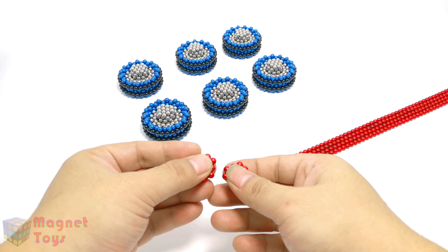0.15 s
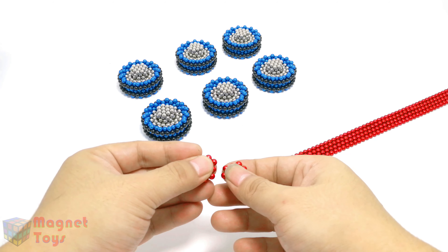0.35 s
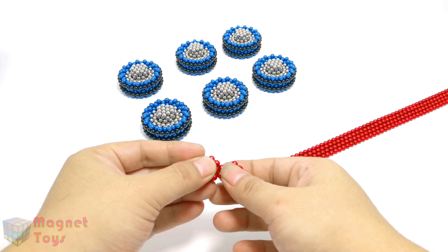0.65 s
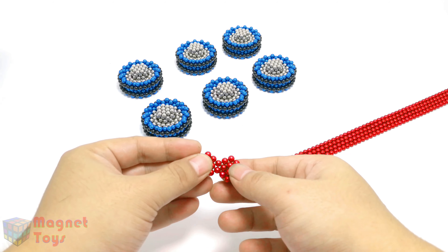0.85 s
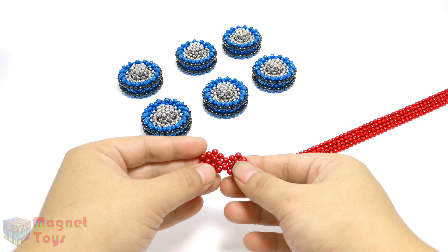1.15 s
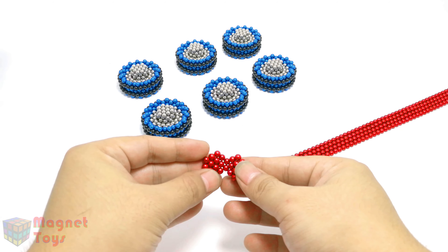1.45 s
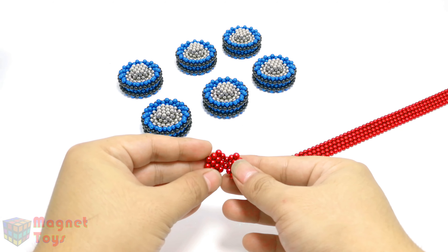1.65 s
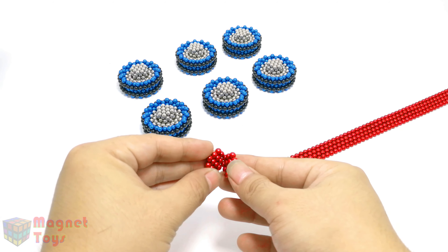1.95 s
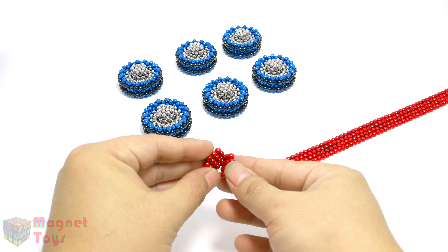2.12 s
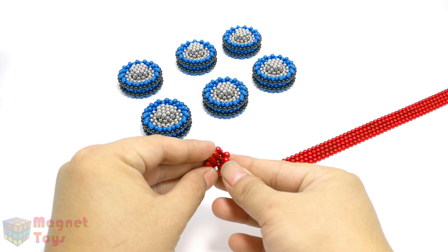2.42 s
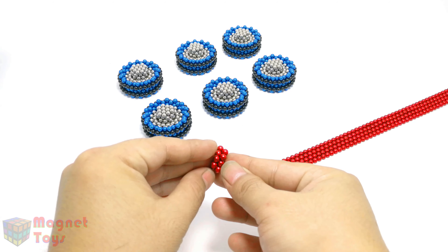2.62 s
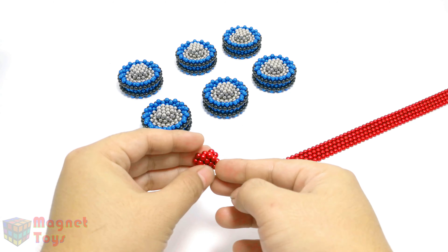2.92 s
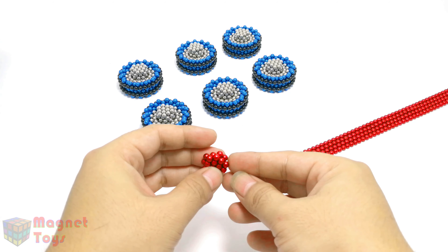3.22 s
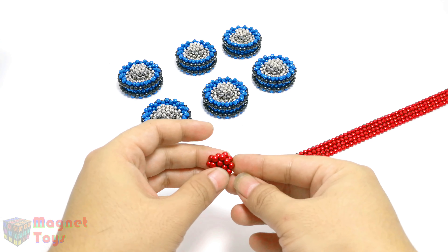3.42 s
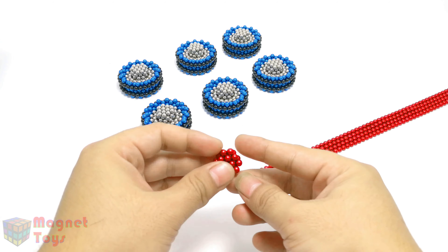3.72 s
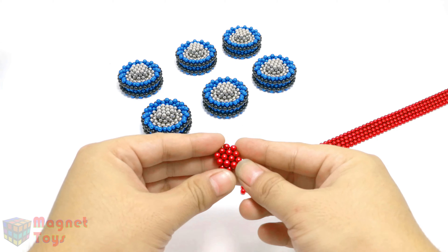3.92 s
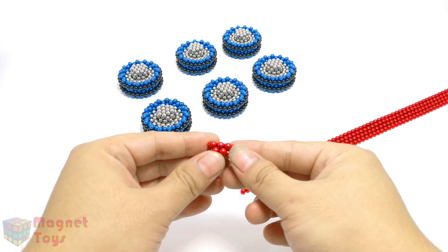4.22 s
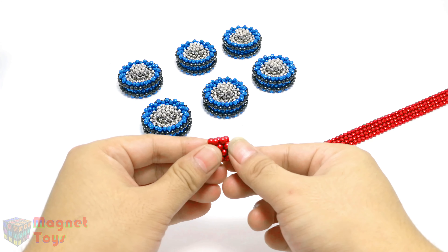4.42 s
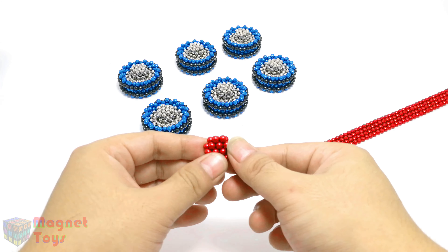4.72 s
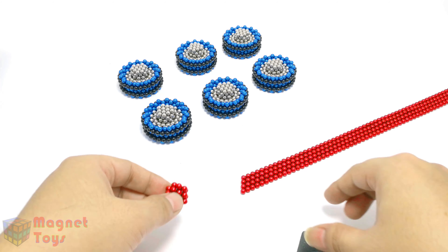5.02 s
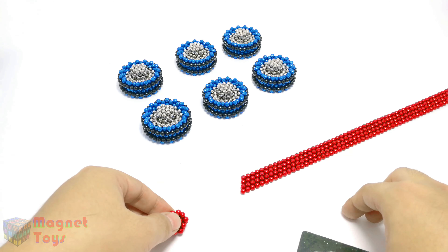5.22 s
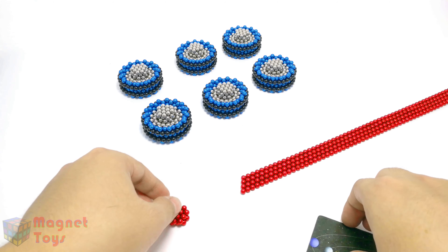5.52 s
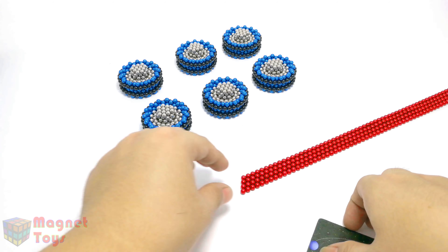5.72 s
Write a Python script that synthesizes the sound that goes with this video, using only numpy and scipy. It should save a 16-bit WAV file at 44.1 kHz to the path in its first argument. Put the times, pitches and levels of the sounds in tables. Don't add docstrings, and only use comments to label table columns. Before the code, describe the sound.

Small steel magnet balls snap together sharply in a quiet humming room, then a stiff card is tapped and dragged across a table.

```python
import sys
import numpy as np
from scipy import signal
from scipy.io import wavfile
from scipy.ndimage import uniform_filter1d

SR = 44100
rng = np.random.default_rng(int(sys.argv[2]) if len(sys.argv) > 2 else 0)


def output_pcm(signal):
    pcm = np.clip(np.atleast_2d(signal).T, -1, 1) * 32767
    wavfile.write(sys.argv[1], SR, np.round(pcm).astype(np.int16))


def how_loud(loudness_db):
    steps = np.asarray(loudness_db, float) / 20
    return 10 ** steps


N = 258426


def evened(x):
    return x / np.sqrt(np.mean(x ** 2) + 1e-20)


def read(points, hz):
    f, value = np.transpose(points)
    return np.interp(np.log(hz + 1), np.log(f + 1), value)


def add(mix, s, sound):
    part = mix[..., round(s * SR):][..., :sound.shape[-1]]
    part += sound[..., :part.shape[-1]]


def resonate(x, hz, width):
    hz = min(hz, .45 * SR)
    return signal.lfilter(*signal.iirpeak(hz, hz / width, SR), x)


def colour(x, points):
    hz = abs(np.fft.fftfreq(2048, 1 / SR))
    log_gain = read(points, hz) * np.log(10) / 20
    taps = np.fft.ifft(np.exp(log_gain - 1j * signal.hilbert(log_gain).imag)).real
    return signal.oaconvolve(x, taps[:1024])[:len(x)]


def dying_noise(decays):
    hz, t, z = signal.stft(rng.standard_normal(SR // 4), SR, nperseg=128)
    t60 = np.clip(read(decays, hz), .02, .4)[:, None]
    return signal.istft(z * how_loud(-60 * t / t60), SR, nperseg=128)[1][:SR // 4]


# (frequency [Hz], time to fall 60 dB [s])
ECHO_TIMES = [(1500, .05), (4000, .085), (7000, .105), (12000, .12)]


def snap(spectrum, db, t60, far_db, tail_db, far_tail_db, thump_db):
    t = np.arange(SR // 4) / SR
    out = []
    thump = resonate((np.arange(len(t)) == 16) * 3., 2200, 4500)
    for side_db, side_tail_db in ((0, 0), (far_db, far_tail_db)):
        burst = rng.standard_normal(len(t)) * how_loud(-60 * t / t60) * np.minimum(t / .0004, 1)
        burst[16] += 3
        burst = colour(burst, spectrum)
        burst = burst / abs(burst).max() + how_loud(thump_db + 5) * thump
        early = dying_noise(ECHO_TIMES)
        late = how_loud(-17) * dying_noise([(hz, 2.05 * s) for hz, s in ECHO_TIMES])
        tail = evened(colour(early + late, spectrum)) * np.clip(t / .002, 0, 1)
        out.append(how_loud(db + side_db) * burst + how_loud(tail_db + side_tail_db) * tail)
    return np.array(out)


# (time [s], peak level [dB], burst fall by 60 dB [s], far burst level [dB])
SNAPS = [
    (.4685, -1.5, .0065, -9),
    (2.3643, -5, .013, -9),
    (2.3722, -1.5, .008, -9),
    (2.4927, -8, .006, -16),
    (2.4959, -1, .007, -16),
]
# (level [dB], far level re near [dB])
SNAP_ECHOES = [(-37, 1), (-41, 1), (-38, 2), (-43, 1), (-39.5, 2)]
SNAP_PUSHES = [-41, -47, -31, -44, -29]
# (frequency [Hz], level [dB per Hz])
SNAP_COLOURS = [
    [(410, -57), (700, -24.5), (1070, -32), (1220, -26), (2060, -30.5), (2900, -20.5), (3410, -34.5),
     (5350, -12), (5950, -22.5), (7770, -12.5), (9110, -22.5), (10000, -11), (13800, -4.5), (15900, -6.5),
     (16800, -29)],
    [(410, -76), (700, -48), (950, -43), (1210, -27), (3410, -24), (6030, -6.5), (7470, -5.5), (8190, -7.5),
     (12700, -2), (14900, -2), (16800, -22)],
    [(410, -51.5), (700, -23), (1060, -42), (1270, -31.5), (4000, -15), (6620, -2), (7270, -1), (9360, 0.5),
     (12700, 5), (15100, 2), (16800, -19)],
]


def balls():
    out = np.zeros((2, N))
    groups = (0, 1, 1, 2, 2)
    for group, (s, *row), echo, push_db in zip(groups, SNAPS, SNAP_ECHOES, SNAP_PUSHES):
        add(out, s, snap(SNAP_COLOURS[group], *row, *echo, push_db))
    return out


# (frequency [Hz], width [Hz], level [dB])
TABLE_RINGS = [(255, 40, -9), (455, 30, -9), (612, 28, 0), (700, 25, -3), (960, 40, -13)]


def knock(spectrum, db, t60, table_db, bounces_per_s):
    t = np.arange(SR // 4) / SR
    noise, chance, size = rng.standard_normal(len(t)), rng.random(len(t)), rng.standard_normal(len(t))
    bounces = 3 * size * (chance < bounces_per_s / SR)
    contact = (.5 * noise + bounces) * how_loud(-60 * t / t60)
    contact[8] -= 5
    wake = 0.41 * dying_noise([(500, 0.3), (3000, 0.13), (16000, 0.13)])
    body = colour(contact + wake, spectrum)
    top = sum(how_loud(d) * resonate(contact, f, w) for f, w, d in TABLE_RINGS)
    return how_loud(db - 14.5) * (evened(body) + how_loud(table_db) * evened(top))


def effort(moves, t):
    s, db, swell_s, fade_s, companion_db = np.transpose(moves)[..., None]
    before = (s - t) / np.maximum(swell_s, .004)
    after = (t - s) / np.maximum(fade_s, .004)
    power = how_loud(db - 20 * np.where(t < s, before, after)) ** 2
    main = np.sqrt(power.sum(0))
    companion = np.sqrt((power * how_loud(companion_db) ** 2).sum(0))
    return main, companion


# (fastest moment [s], scratch level [dB], swell [s per 20 dB], fade [s per 20 dB], hiss re scratch [dB])
STROKES = [(3.61, -76, .6, .06, 2), (3.712, -63.5, .094, .041, -2), (3.782, -63.5, .044, .15, -11),
           (3.912, -76, .1, .15, -8), (5.042, -63.5, .015, .08, -7), (5.072, -60, .013, .064, -5),
           (5.176, -51, .012, .064, -19), (5.232, -52, .035, .2, -4), (5.268, -47.5, .07, .055, -3),
           (5.352, -57, .12, .03, -1), (5.386, -52, .012, .05, -4), (5.447, -63, .1, .12, -18),
           (5.618, -52.5, .022, .044, -8), (5.692, -49.5, .04, .09, -19), (5.788, -53, .025, .15, -13),
           (5.822, -47.5, .09, .045, -13)]
# (heaviest moment [s], low drag level [dB], swell [s per 20 dB], fade [s per 20 dB], table hum re drag [dB])
PRESSES = [(3.51, -61, .022, .5, -16), (3.712, -62, .3, .04, -7), (3.782, -56.5, .03, .09, -11),
           (3.912, -64, .04, .05, -9), (5.05, -65, .2, .1, -20), (5.176, -48, .012, .16, 5),
           (5.262, -53, .12, .1, 8), (5.353, -48, .07, .022, 4), (5.39, -54, .012, .14, 3),
           (5.462, -59, .3, .03, 7), (5.616, -65.5, .12, .05, 0), (5.72, -66, .3, .3, 0),
           (5.83, -65, .2, .3, -2)]


def rub(start, end, spectrum):
    t = np.arange(start, end, 1 / SR)
    slide, fizz = effort(STROKES, t)
    weight, drone = effort(PRESSES, t)
    noise, chance, size = rng.standard_normal(len(t)), rng.random(len(t)), rng.exponential(1, len(t))
    slips = noise * (0.54 + (chance < 2500 / SR) * how_loud(2.6 * np.minimum(size, 4)))
    scratch = evened(colour(slips, spectrum))
    rings = [how_loud(d) * resonate(resonate(slips, f, w), f, 4 * w) for f, w, d in TABLE_RINGS[2:]]
    hum = evened(sum(rings))
    low = evened(resonate(resonate(slips, 302, 230), 233, 340))
    hiss = evened(colour(slips, [(2500, -61), (5000, -6), (16000, -10)]))
    mix = slide * scratch + how_loud(-4) * drone * hum + fizz * hiss + how_loud(-4.5) * weight * low
    return how_loud(5.5) * mix * signal.windows.tukey(len(t), .08)


def tick(db, hz, t60):
    t = np.arange(SR // 12) / SR
    click, wake = how_loud(-60 * t / 0.0021), how_loud(-5 - 60 * t / t60)
    x = rng.standard_normal(len(t)) * (click + wake)
    x = resonate(resonate(x, hz, 0.89 * hz), hz, 0.96 * hz) + 0.074 * np.diff(x, prepend=0)
    return how_loud(db + 6.5) * x / abs(x).max()


SQUEAK_HZ = [9050, 9550, 10200]


def squeak(length, db):
    noise = rng.standard_normal(round(length * SR))
    bands = sum(resonate(noise, f, 300) for f in SQUEAK_HZ)
    return how_loud(db) * evened(bands) * signal.windows.tukey(len(noise), .4)


# (time [s], peak level [dB], centre [Hz], fall by 60 dB [s])
TICKS = [(0.852, -51, 11200, 0.03), (1.0492, -54, 8490, 0.03), (2.3245, -49, 11000, 0.02),
         (2.6774, -53, 11900, 0.03), (3.4002, -51, 13800, 0.034), (3.6034, -46, 10000, 0.026),
         (4.882, -49, 7900, 0.03), (5.041, -48.5, 3440, 0.044), (5.0738, -45.5, 3030, 0.064),
         (5.6064, -46.5, 3080, 0.032), (5.7497, -45.5, 4480, 0.059)]
# (time [s], peak level [dB], chatter fall by 60 dB [s], table ring level [dB], bounces [per s])
KNOCKS = [
    (4.839, -43.5, 0.099, -11, 1200),
    (5.152, -25, 0.083, -3.5, 800),
    (5.3594, -23.5, 0.086, -7, 870),
]
# (frequency [Hz], level [dB per Hz])
FINGER_COLOUR = [(70, -20), (120, 0), (380, -2), (520, -22), (1000, -32), (2800, -30), (4500, -55)]
# (frequency [Hz], level [dB per Hz])
CARD_FLAT = [(88, -45), (150, -20.5), (601, -9.5), (941, -10), (1900, -1.5), (2140, -10), (2360, -3.5),
             (3290, -20.5), (3550, -26), (5570, -55), (6770, -36), (9440, -27.5), (10600, -31),
             (11900, -26), (16000, -34)]
# (frequency [Hz], level [dB per Hz])
CARD_EDGE = [(88, -35), (150, -21), (222, -12.5), (601, -3), (745, -7.5), (871, -14.5), (1340, -10),
             (1660, -18), (3350, -9.5), (5150, -19.5), (5790, -36), (6390, -27.5), (12400, -18.5),
             (16000, -28)]
# (start [s], end [s])
SPELLS = [(3.5, 3.95), (5.03, 5.12), (5.175, 5.358), (5.385, 5.52), (5.59, 5.66), (5.66, 5.86)]
# (frequency [Hz], level [dB per Hz])
RUB_COLOURS = [
    [(600, -31), (1000, 10.5), (2500, 2), (5000, -11), (7000, -18)],
    [(1060, -37), (1800, -16), (2450, -21), (2800, 10), (3450, -3), (3830, 8), (6000, -27), (7800, -55),
     (13200, -120)],
    [(530, -32), (900, -5), (1150, 3.5), (1350, -6), (1670, -1), (2970, -6.5), (3290, -2), (7000, -16.5),
     (9100, -35), (15400, -120)],
    [(530, -32), (900, -9), (1370, -5), (1730, -10), (3580, -9), (6000, -27), (7800, -60), (13200, -120)],
    [(530, -45), (900, -3), (1540, 0.5), (1990, 2), (2730, -5), (3130, -5), (6000, -6), (7800, -53),
     (13200, -120)],
    [(530, -56), (900, -1.5), (978, -17), (1180, -0.5), (1250, -7), (1620, 2), (2020, 2), (2310, -5.5),
     (4790, -10), (6500, -23), (8450, -29), (14300, -120)],
]
# (start [s], end [s], level [dB])
SQUEAKS = [
    (0.069, 0.326, -67),
    (4.699, 4.803, -68),
]


def table():
    out = np.zeros(N)
    for s, *row in TICKS:
        add(out, s, tick(*row))
    for spectrum, (s, *row) in zip((FINGER_COLOUR, CARD_FLAT, CARD_EDGE), KNOCKS):
        add(out, s, knock(spectrum, *row))
    for (start, end), spectrum in zip(SPELLS, RUB_COLOURS):
        add(out, start, rub(start, end, spectrum))
    for start, end, db in SQUEAKS:
        add(out, start, squeak(end - start, db))
    return out


# (frequency [Hz], level [dB])
SHADOW = [(200, 1), (600, -1), (1000, -5), (2000, -8), (3500, -14), (7000, -20), (16000, -22)]


def far_side(x):
    lag_s = 13e-5
    return np.roll(colour(x, SHADOW), round(lag_s * SR))


# (frequency [Hz], level [dB per Hz])
ROOM_COLOUR = [(21, -34), (36, -4), (70, -13.5), (107, 1.5), (142, -4.5), (188, -3), (224, -10.5),
               (328, -11.5), (468, -19), (532, -13), (574, -19.5), (619, -17.5), (1990, -29), (15600, -31)]
# (frequency [Hz], likeness 0 to 1)
SAME = [(60, 0.94), (170, 0.9), (350, 0.33), (700, 0.067), (1100, 0.059), (1600, 0.0063), (16000, 0.009)]
# (frequency [Hz], phase [rad])
LEAD = [(60, -0.072), (200, 0.24), (700, -2.06)]
# (frequency [Hz], level [dB])
TILT = [(60, -1.5), (150, -1), (380, -2.5), (950, 1.5), (2380, -1), (5980, 1.5), (15000, 4)]
# (frequency [Hz], width [Hz], level [dB])
ROOM_MODES = [(24.5, 14, -64.5), (46.2, 4.1, -96), (118.7, 21.4, -63), (184, 6.1, -63)]
HUM_DB = [-67, -61]


def room():
    frames, hz = N // 512 + 5, np.fft.rfftfreq(2048, 1 / SR)
    a, b, c, d, patches = rng.standard_normal((frames, 1025, 5)).T
    patches = evened(uniform_filter1d(uniform_filter1d(patches, 12, 0), 8, 1))
    same = np.clip(read(SAME, hz), -1, 1)[:, None]
    left = a + 1j * b
    shared = same * left * np.exp(-1j * read(LEAD, hz))[:, None]
    right = shared + np.sqrt(1 - same ** 2) * (c + 1j * d)
    tilt = how_loud(read(TILT, hz)[:, None] / 2)
    z = np.array([left * tilt, right / tilt]) * how_loud(read(ROOM_COLOUR, hz)[:, None] + 1.84 * patches)
    wash = how_loud(-55.5) * evened(signal.istft(z, nperseg=2048, noverlap=1536)[1][:, :N])
    noise = rng.standard_normal(N)
    boom = sum(how_loud(db) * evened(resonate(noise, f, w)) for f, w, db in ROOM_MODES)
    waver = evened(resonate(rng.standard_normal(N), 9, 2.3))
    phase = 2 * np.pi * 538.8 * np.arange(N) / SR - np.array([[.3], [0]])
    hum = np.sqrt(2) * (1 + 0.04 * waver) * np.sin(phase)
    return wash + boom * how_loud(np.array([[-.8], [.8]])) + hum * how_loud(np.array(HUM_DB)[:, None])


# (frequency [Hz], level [dB])
SCATTER = [(200, -13), (700, -3), (2000, 2.5), (16000, -10)]


def scene():
    near, far = balls()
    direct = table()
    scattered = colour(table(), SCATTER)
    hands = np.array([near + direct, far_side(far + how_loud(-3.5) * direct + scattered)])
    return hands + room()


def roll_off(x):
    return signal.sosfilt(signal.butter(12, 17140, fs=SR, output="sos"), x)


def record(dry):
    quiet_edge_hz, loud_edge_hz = 15900, 16600
    low = []
    for hz in (quiet_edge_hz, loud_edge_hz):
        taps = signal.firwin(511, hz, window=("kaiser", 9), fs=SR)
        low.append(signal.oaconvolve(dry, taps[None], "same", axes=1))
    loud = np.clip(uniform_filter1d(abs(dry).max(0), 300) / .05 - 1, 0, 1)
    mix = low[0] + loud * (low[1] - low[0])
    return roll_off(mix)


dry = scene()
out = record(dry)
output_pcm(out)
```